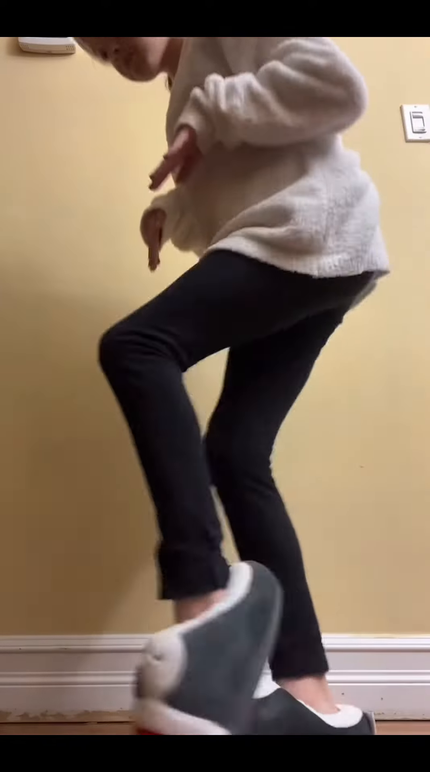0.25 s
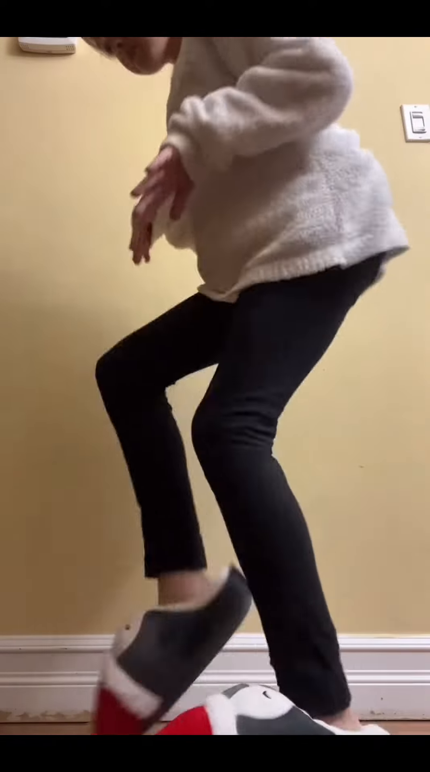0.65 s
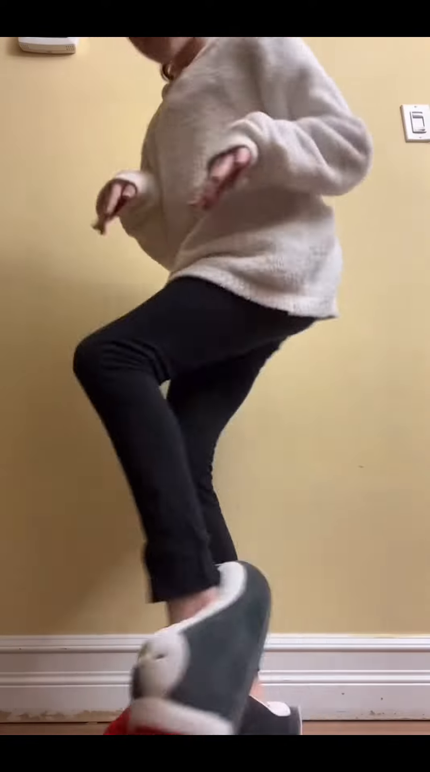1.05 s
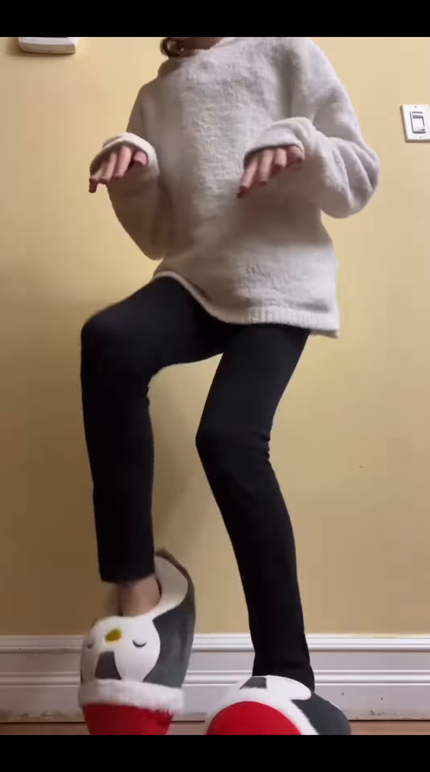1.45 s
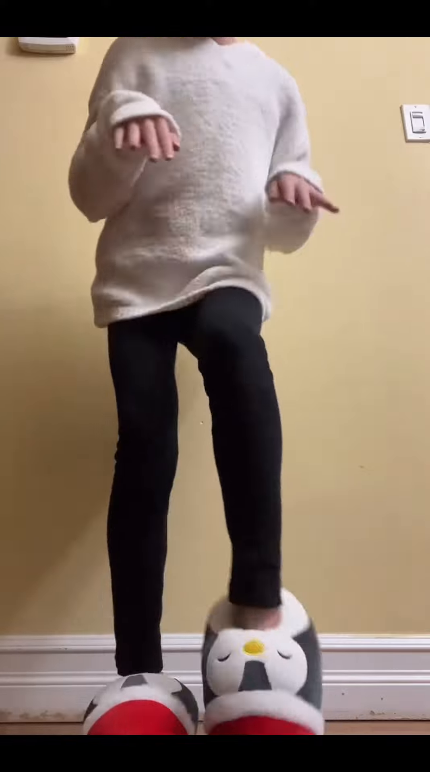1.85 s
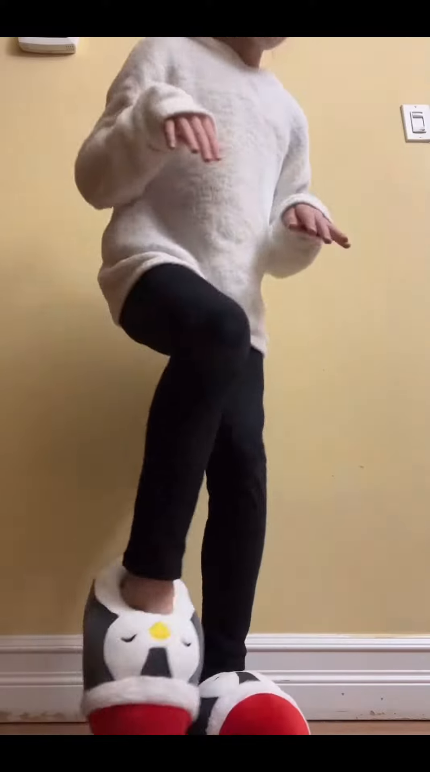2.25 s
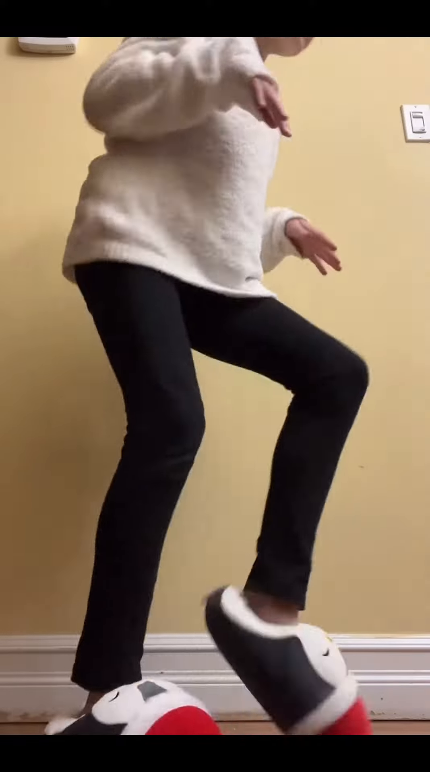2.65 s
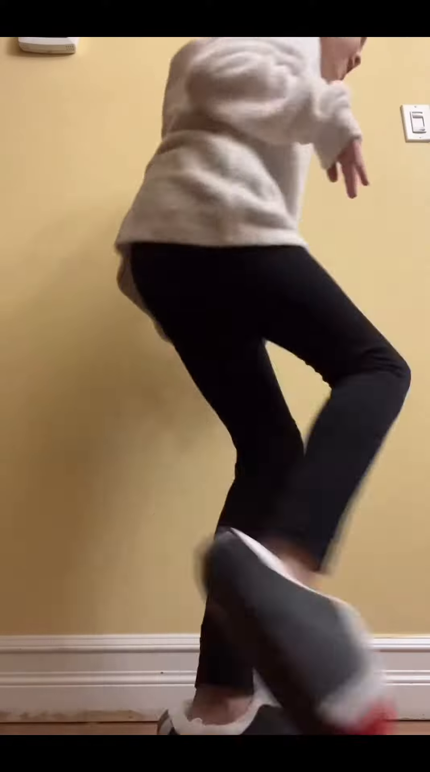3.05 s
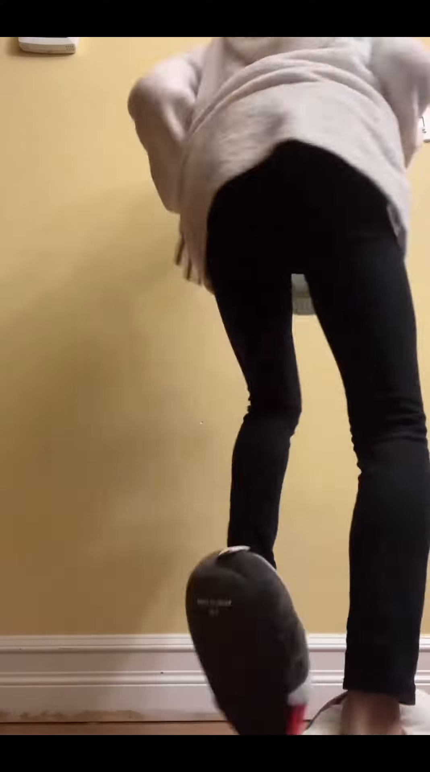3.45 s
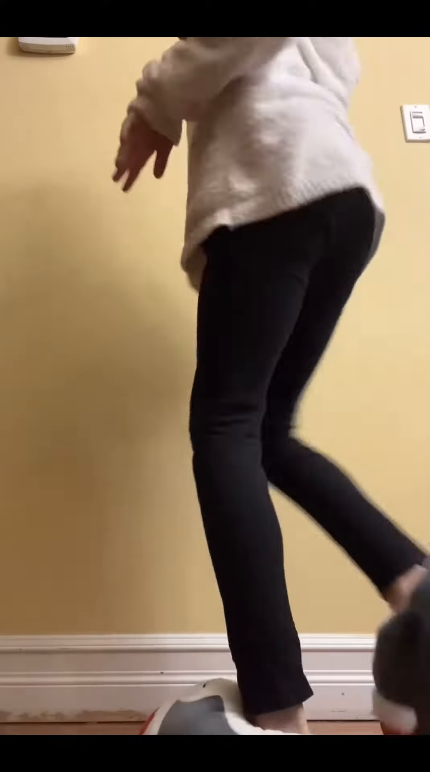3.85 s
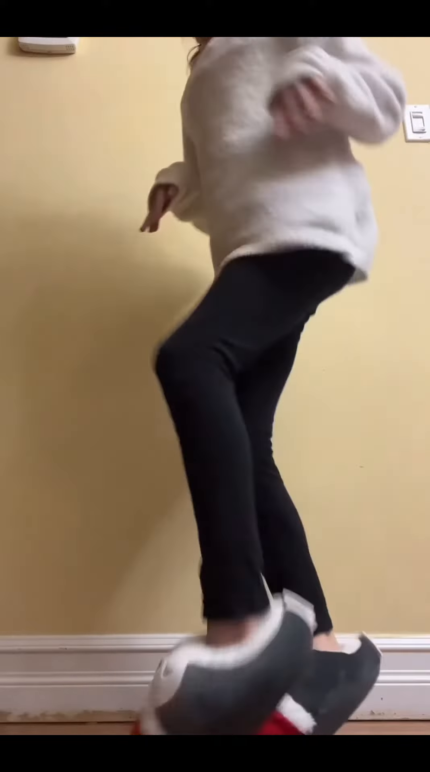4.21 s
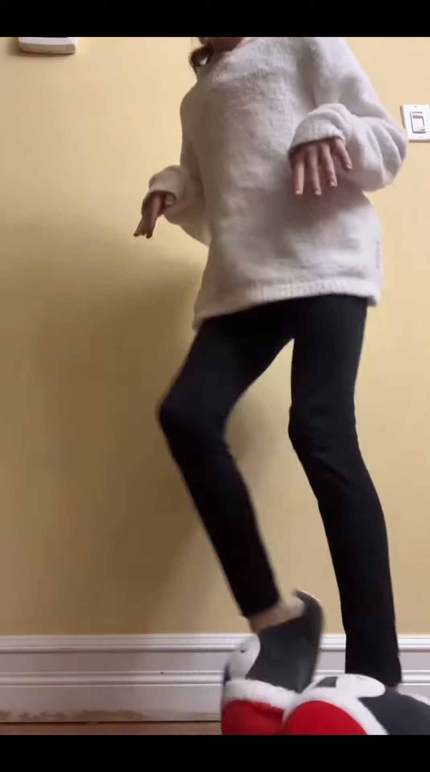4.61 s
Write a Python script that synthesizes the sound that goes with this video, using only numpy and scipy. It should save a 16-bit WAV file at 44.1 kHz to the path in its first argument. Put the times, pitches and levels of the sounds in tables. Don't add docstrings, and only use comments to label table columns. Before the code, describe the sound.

Plush slippers shuffle and scuff quickly over a wooden floor, with crackly ticks, a couple of tiny rubbery squeaks and soft dull pats.

```python
import sys
import numpy as np
from scipy import signal
from scipy.fft import rfft, irfft
from scipy.io import wavfile
from scipy.ndimage import uniform_filter1d, map_coordinates

SR = 44100
rng = np.random.default_rng(int(sys.argv[2]) if len(sys.argv) > 2 else 0)


def gain_from_decibels(decibels):
    exponent = np.asarray(decibels, float) / 20
    return 10 ** exponent


def wav_record(signal):
    frames = np.transpose(np.atleast_2d(signal))
    bounded = np.clip(frames, -1, 1)
    quanta = np.round(bounded * 32767).astype(np.int16)
    wavfile.write(sys.argv[1], SR, quanta)


N = 210562
TOP_HZ = 15780


def unit(x):
    return x / np.sqrt(np.mean(x ** 2) + 1e-20)


def along(points, hz):
    f, v = np.transpose(points)
    return np.interp(np.log(hz + 1), np.log(f + 1), v)


def wobble(rate_hz):
    knots = rng.standard_normal(int(N * rate_hz / SR) + 4)
    return map_coordinates(knots, [np.arange(N) * rate_hz / SR])


def coloured(x, spectrum):
    m = 8192
    magnitude = gain_from_decibels(along(spectrum, np.fft.rfftfreq(m, 1 / SR))) + 1e-4
    cepstrum = irfft(np.log(magnitude))
    cepstrum[1:m // 2] *= 2
    cepstrum[m // 2 + 1:] = 0
    response = irfft(np.exp(rfft(cepstrum)))
    return signal.fftconvolve(x, response)[:N]


def resonate(x, hz, q):
    return signal.lfilter(*signal.iirpeak(hz, q, SR), x)


def add(track, start_s, sound):
    at = track[round(start_s * SR):][:len(sound)]
    at += sound[:len(at)]


def slides():
    # peak_s, level_db, rise_s, fall_s (each spans 20 dB), body_re_level_db
    strokes = [(0.127, -32.5, 0.074, 0.17, -4), (.494, -33, 0.074, 0.088, -3.5),
               (0.95, -33.5, 0.12, 0.15, -4), (1.307, -40.5, 0.096, 0.36, -0.5),
               (1.655, -41, 0.073, .18, -4.5), (2.085, -42, 0.11, 0.2, -0.5),
               (2.466, -40.5, 0.079, 0.21, -2.5), (2.868, -39, 0.077, 0.19, -2.5),
               (3.266, -36.5, 0.064, 0.24, -3.5), (3.704, -36.5, 0.069, 0.18, -8),
               (4.133, -38.5, 0.043, 0.07, -0.5), (4.583, -45.5, 0.12, 0.94, -6.5),
               (.245, -35.5, 0.2, 0.15, -3.5), (.378, -44, 0.016, 0.012, -18), (.68, -39, 0.33, 0.027, -2),
             (.725, -39, .018, 0.076, -8.5), (0.864, -49, 0.0037, 0.14, -2), (1.064, -39, 0.13, 0.052, 2),
             (1.501, -46.5, 0.093, 0.03, 0), (1.837, -42, 0.025, 0.042, -14),
             (1.863, -38.5, 0.057, 0.12, 0.5), (2.603, -39.5, 0.0068, 0.094, 2),
             (3.034, -42, 0.01, 0.079, -1.5), (3.183, -54, .004, .2, -23), (3.39, -43, 0.22, 0.042, -1),
             (3.47, -46.5, .1, 0.041, 6), (3.774, -36, 0.039, 0.12, 3), (3.815, -36.5, 0.026, .2, -15),
             (3.94, -44, 0.14, 0.057, 5), (4.255, -39.5, 0.14, 0.12, -0.5), (4.395, -50, 0.05, 0.02, 2),
             (4.488, -46, .003, 0.23, 2), (4.747, -29, 0.047, 0.037, -0.5)]
    # peak_s, level_db, rise_s, fall_s, fibre_re_level_db
    brushes = [(.248, -32.5, 0.18, 0.092, -5.5), (.47, -41, 0.071, 0.41, -15),
               (.684, -35.5, 0.14, 0.011, -6), (.725, -38.5, 0.028, 0.089, -7.5),
               (1.009, -32, 0.16, 0.14, -6), (1.3, -44.5, 0.19, 0.38, -14), (1.42, -36.5, .1, 0.15, -6),
               (1.75, -49.5, 0.34, 0.39, -9), (1.862, -37.5, 0.058, 0.089, -7.5),
               (2.09, -42.5, 0.056, 0.18, -18), (2.22, -45, 0.1, 0.17, -8), (2.325, -50, .02, .03, -6),
               (2.619, -40.5, 0.044, 0.1, -3), (2.54, -44.5, 0.14, 0.21, -12),
               (2.867, -44.5, 0.073, 0.33, -16), (3.0, -46.5, .1, 0.17, -3.5), (3.265, -36, 0.088, .25, -7),
               (3.41, -38, 0.19, .12, -8.5), (3.704, -44, 0.099, 0.73, -3.5),
               (3.815, -36, 0.089, 0.19, -3.5), (4.131, -34, 0.04, 0.087, -9.5),
               (4.255, -38.5, 0.1, 0.12, -3.5), (4.502, -41, 0.023, 0.088, -13), (4.64, -41, .025, .02, -1),
               (4.675, -40, 0.07, 0.06, -1), (3.41, -36, .015, .02, -6), (4.746, -26.5, .04, 0.032, -8)]
    # time_s, share (0-1)
    grit_share = [(.06, 0.15), (.14, 0.7), (.3, 0.5), (.5, 0.2), (.6, 0.3), (.7, 0.4), (.84, 0.15),
                  (.97, 0.6), (1.2, 0.2), (1.35, 0.3), (2.27, 0.5), (2.45, 0.28), (3.18, 0.15), (3.27, 0.6),
                  (3.55, 0.13), (3.72, 0.5), (3.8, 0.44), (4.5, 0.33)]
    # freq_hz, density_db (per Hz)
    scuff_spectrum = [(1240, -30.5), (2100, -6), (2210, -2.5), (3290, 1), (4250, -2), (5200, -5.5),
                      (6760, -11), (11400, -120)]
    # freq_hz, density_db (per Hz)
    body_spectrum = [(260, -33), (450, -8.5), (562, -11.5), (840, -5.5), (1110, -5.5), (1560, -0.5),
                     (1710, -2), (2500, -5.5), (3250, -26), (5500, -120)]
    # freq_hz, density_db (per Hz)
    swish_spectrum = [(3000, -33), (4800, -4.5), (5800, 3), (6900, 4.5), (7600, 1), (8400, -7.5),
                      (10500, -20.5), (16000, -47)]
    # freq_hz, density_db (per Hz)
    fibre_spectrum = [(4710, -33), (8000, 0.5), (10100, -7), (13700, -9.5), (15600, -13.5)]

    peak_s, db, rise, fall, body_db = np.transpose(strokes)
    scuff = swell(peak_s, db, rise, fall)
    body = swell(peak_s, db + body_db, 0.69 * rise, 1.12 * fall)
    peak_s, db, rise, fall, fibre_db = np.transpose(brushes)
    swish = swell(peak_s, db, rise, fall)
    fibre = swell(peak_s, db + fibre_db, 0.86 * rise, 0.79 * fall)
    swish = np.hypot(swish, gain_from_decibels(-11) * scuff)
    fibre = np.hypot(fibre, gain_from_decibels(-21) * scuff)

    grit = np.interp(np.arange(N) / SR, *np.transpose(grit_share)).clip(0, 1)
    rate_hz = (600 * (scuff / gain_from_decibels(-39)) ** 0.61).clip(260, 1200)
    hiss = gain_from_decibels(1.5 * wobble(40)) * rng.standard_normal(N)
    gritty = catches(rate_hz, spread_db=2.5, t60=0.0029)
    rub = np.sqrt(grit) * gritty + np.sqrt(1 - grit) * unit(hiss)
    rub = patchy(rub, depth_db=2.5)
    twin = rub * np.sign(rng.standard_normal(N))
    fine = twin + 0.15 * rng.standard_normal(N)

    out = scuff * unit(coloured(twin, scuff_spectrum))
    out += body * gain_from_decibels(1.05 * wobble(60)) * unit(coloured(rub, body_spectrum))
    out += swish * unit(coloured(rub, swish_spectrum))
    out += fibre * unit(coloured(fine, fibre_spectrum))
    return gain_from_decibels(-1.2) * out


def swell(peak_s, db, rise, fall):
    roundness = 1.137
    late = np.arange(0, N + 64, 64)[:, None] / SR - peak_s
    reach = np.where(late < 0, -late / np.abs(rise), late / np.abs(fall))
    power = np.sum(gain_from_decibels(db - 20 * reach ** roundness) ** 2, axis=1)
    gain = np.sqrt(power + 1e-12)
    return np.interp(np.arange(N) / 64, np.arange(len(gain)), gain)


def catches(rate_hz, spread_db, t60):
    chances_hz = 1400
    gap, size, luck = rng.random((7200, 3)).T
    at = (np.cumsum(.4 + 1.2 * gap) * SR / chances_hz).astype(int).clip(0, N - 1)
    held = 1 / (1 + np.exp((luck - rate_hz[at] / chances_hz) / .03))
    strength = held * gain_from_decibels(-spread_db * np.log(1 - size).clip(-2.2))
    inside = at < N - 1
    kicks = np.bincount(at[inside], strength[inside], N)
    decay = gain_from_decibels(-60 * np.arange(SR // 20) / SR / t60)
    puff = signal.fftconvolve(kicks, decay)[:N]
    return unit((puff * rng.standard_normal(N) + 3.2 * kicks) / np.sqrt(rate_hz))


def patchy(x, depth_db):
    z = signal.stft(x, nperseg=256)[2]
    field = uniform_filter1d(rng.standard_normal(z.shape), size=3, axis=0)
    field = uniform_filter1d(field, size=10, axis=1)
    return unit(signal.istft(z * gain_from_decibels(depth_db * unit(field)), nperseg=256)[1][:N])


def ticks():
    # start_s, level_db, snap_hz
    dot_snaps = [(0.0285, -28, 9000), (0.039, -25, 5380), (0.0625, -22, 3640), (0.2074, -13, 3840),
                 (0.689, -35, 6980), (0.7705, -24, 7000), (0.861, -23, 5170), (0.8828, -21, 3400),
                 (1.1999, -27, 5800), (1.278, -23, 6400), (1.6493, -37, 3070), (1.8275, -20, 4630),
                 (1.8376, -15.5, 4010), (2.393, -30, 2920), (2.603, -20, 6180), (2.962, -36, 7180),
                 (3.0046, -37, 6860), (3.0336, -18, 6500), (4.492, -27, 11000), (3.2167, -23, 4970),
                 (3.613, -31, 5500), (3.636, -26, 3770), (3.8357, -7, 5860), (3.8574, -27, 6170),
                 (3.897, -38, 9340), (4.006, -25, 6400), (4.0856, -26, 6230), (4.257, -16, 7100),
                 (4.488, -27, 3880), (4.724, -14, 11000),
                 (.0359, -24, 5600), (.0484, -28, 4000), (.0735, -27, 3500), (.0785, -21, 4300),
                (.088, -23, 4000), (.0975, -17, 3500), (.1709, -14, 3200), (.181, -20, 3500),
                (.2237, -11, 4200), (.4155, -33, 5000), (.423, -30, 6000), (.431, -25, 5000),
                (.4383, -21, 4700), (.6524, -17, 6000), (.6667, -15, 4500), (.6822, -13, 4600),
                (.7162, -25, 6100), (.7266, -19, 6800), (.7767, -26, 5100), (.7932, -27, 5800),
                (.872, -26, 3000), (.962, -14, 4500), (1.2046, -30, 5400), (1.2106, -30, 5000),
                (1.2139, -25, 5400), (1.2208, -25, 5200), (1.2377, -24, 5400), (1.2555, -28, 9000),
                (1.46, -26, 9500), (1.57, -34, 7000), (1.8445, -17, 5000), (2.3295, -30, 6200),
                (2.407, -33, 3500), (3.1751, -31, 5600), (3.1781, -30, 4900), (3.1823, -24, 5000),
                (3.1857, -30, 4100), (3.1947, -28, 5200), (3.2022, -27, 4700), (3.6192, -32, 5300),
                (3.6488, -25, 4000), (3.6528, -24, 3700), (3.6724, -21, 4600), (3.6939, -17, 3600),
                (3.7053, -14, 3300), (3.722, -18, 4500), (4.056, -33, 5500), (4.071, -32, 5000),
                (4.0945, -22, 10000), (4.1177, -21, 9500), (4.1235, -19, 3300), (4.1295, -17, 4000),
                (4.1362, -15, 7200), (4.476, -35, 5000), (4.6365, -16, 8500), (4.643, -17, 8500),
                (4.6664, -19, 7100), (4.7185, -20, 7000), (4.7288, -17, 9000), (4.7495, -13, 6000)]
    # first_s, last_s, first_db, last_db, snap_hz
    peels = [
        (2.235, 2.278, -30, -24, 8000),
        (2.785, 2.843, -36, -38, 3500),
        (3.225, 3.245, -26, -22, 5000),
        (1.468, 1.495, -30, -27, 9000),
    ]
    # start_s, level_db, snap_hz, knock_re_level_db, knock_hz
    knocks = [
        (0.194, -19.5, 3170, -13, 1610),
        (0.376, -17, 5840, -16, 810),
        (1.498, -20, 5990, -17, 900),
        (1.508, -18, 5700, -18.5, 726),
        (1.8422, -25, 3550, -12, 1570),
        (1.8644, -35, 2800, -5, 1510),
        (1.873, -36, 2660, 3, 1490),
        (3.9389, -25, 2640, -8.5, 1360),
    ]
    peel_gap_s = .009
    out, t = np.zeros(N), np.arange(SR // 20) / SR

    peeled = []
    for first, last, first_db, last_db, snap_hz in peels:
        for s in np.linspace(first, last, 1 + round((last - first) / peel_gap_s)):
            jittered_s = s + .2 * peel_gap_s * rng.normal()
            db = np.interp(s, [first, last], [first_db, last_db]) + 2.9 * rng.normal()
            peeled.append((jittered_s, db, snap_hz))

    # knock re peak (dB), knock pitch (Hz), t60 (s)
    releases = [(*row, -32, 1620, 0.006) for row in [*dot_snaps, *peeled]]
    releases += [(*row, 0.013) for row in knocks]
    for s, db, snap_hz, knock_db, knock_hz, t60 in releases:
        fade = gain_from_decibels(-60 * t / max(t60, .002))
        burst = rng.standard_normal((2, len(t))) * fade
        burst[0, 0] = 4
        snap = resonate(burst[0], snap_hz, 1.2)
        knock = resonate(burst[1] / np.sqrt(fade), knock_hz, 2.2)
        add(out, s, gain_from_decibels(db - 6.0) * snap / abs(snap).max())
        add(out, s + 0.0008, gain_from_decibels(db + knock_db + 12.0) * knock / abs(knock).max())
    return coloured(out, [(250, -52), (500, -10), (2800, 3), (7500, 4.0), (9000, -9.5), (15000, -10)])


def squeaks():
    # start_s, stop_s, start_hz, stop_hz, level_db
    glides = [(1.085, 1.094, 4700, 8200, -32), (4.695, 4.714, 2650, 3050, -33),
              (4.234, 4.25, 1000, 5000, -31), (3.003, 3.008, 6300, 8800, -34),
              (2.959, 2.967, 6830, 8000, -35.5), (2.976, 2.984, 7800, 10300, -31),
              (2.986, 2.991, 9300, 12200, -25), (2.997, 3.002, 8800, 10600, -30),
              (3.4, 3.4136, 1357, 2050, -13.5), (4.245, 4.252, 8200, 12200, -25),
              (4.254, 4.259, 8800, 11500, -26), (4.257, 4.262, 2260, 3630, -26),
              (4.267, 4.273, 6700, 8100, -31), (3.778, 3.8054, 641.5, 1538, -8.5),
              (3.809, 3.834, 2900, 4600, -30)]
    # start_s, level_db, pitch_hz, t60_s
    rings = [
        (3.413, -34.5, 1736, 0.39),
        (3.805, -43, 1370, .3),
    ]
    # freq_hz, level_db
    rubber_spectrum = [(300, -25), (600, -7.5), (2000, 1), (3000, -6), (4000, 1.5), (5000, -3.5),
                       (7000, 5.5), (9000, -9), (15000, -33)]
    out = np.zeros(N)
    for start, stop, hz0, hz1, db in glides:
        slope_db = -10.5 - 5 * np.log2(hz0 / 1000)
        u = np.linspace(0, 1, round((stop - start) * SR))
        shake = uniform_filter1d(rng.standard_normal((2, SR // 20)), size=30)[:, :len(u)]
        slip_hz = hz0 * (hz1 / hz0) ** u * (1 + 0.24 * shake[0])
        phase = 2 * np.pi * np.cumsum(slip_hz) / SR
        pulses = sum(gain_from_decibels(slope_db * np.log2(k)) * np.cos(k * phase)
                     for k in range(1, 7) if k * hz1 < TOP_HZ)
        noise = rng.standard_normal(SR // 20)[:len(u)]
        rasp = 0.45 * min(1, 2000 / hz1) ** 2 * (1 + np.cos(phase)) * noise
        left = (1 - u) * (stop - start)
        bite_db = -10 / (1 + np.exp((.0065 - left) / .0012))
        ramps = np.minimum(1, 8 * u) * np.minimum(1, left / 0.0017)
        add(out, start, gain_from_decibels(db + bite_db + 7 * shake[1]) * ramps * (pulses + rasp))
    for s, db, hz, t60 in rings:
        ring = resonate(rng.standard_normal(SR // 2), hz, 11)
        add(out, s, gain_from_decibels(db - 60 * np.arange(SR // 2) / SR / t60) * unit(ring))
    return coloured(out, rubber_spectrum)


def puffs():
    # start_s, level_db, centre_hz, rise_s, t60_s
    squeezes = [(3.397, -20.5, 2200, 0.0046, 0.041), (4.38, -50, 3200, 0.012, 0.07),
                (1.508, -39.5, 270, .004, 0.085), (.495, -34.5, 680, 0.015, 0.19),
                (2.166, -29, 6300, 0.008, 0.034), (2.197, -33, 6300, 0.004, 0.034),
                (2.89, -41, 680, 0.018, 0.25), (3.412, -25, 5930, 0.0009, 0.02),
                (3.409, -30, 16000, .002, .03), (0.32, -50, 11000, .001, 0.013),
                (3.893, -26, 9300, 0.0034, 0.032), (0.666, -48, 6600, 0.0028, 0.059),
                (.68, -37, 5000, 0.0034, 0.012), (1.5, -36, 440, 0.0099, 0.13),
                (1.507, -37, 11500, .002, .025), (4.38, -43.5, 8700, .01, 0.096),
                (1.861, -22.5, 1590, 0.0039, 0.074), (3.403, -34, 6300, 0.0058, 0.035),
                (3.805, -23, 5300, .001, 0.024), (3.8085, -16, 7000, .002, 0.018),
                (1.86, -27, 2400, .004, .08), (4.735, -31, 520, .005, .08), (.378, -36, 480, .002, .05),
                (1.858, -34, 900, .004, .07), (3.399, -26, 1350, .003, .04), (4.25, -29, 8000, .002, .02),
                (2.614, -34, 10500, .006, .06), (.975, -35, 8000, .02, .2), (1.32, -33, 1400, .008, .08),
                (4.59, -36, 2400, .01, .12), (4.729, -21, 1250, 0.0054, 0.073)]
    out, t = np.zeros(N), np.arange(SR // 5) / SR
    for s, db, hz, rise, t60 in squeezes:
        air = resonate(rng.standard_normal(len(t)), hz, 3.2)
        add(out, s, gain_from_decibels(db - 60 * t / t60) * (1 - np.exp(-t / rise)) * unit(air))
    return out


def pats():
    # start_s, level_db, pitch_hz, t60_s
    footfalls = [(0.315, -36.5, 207, 0.04), (0.378, -42, 212, 0.084), (0.571, -47.5, 199, 0.08),
                 (1.066, -40.5, 228, 0.046), (1.382, -34, 187, 0.043), (1.444, -35, 196, 0.047),
                 (1.509, -39, 326, .07), (1.519, -41.5, 394, 0.06), (1.742, -44, 188, 0.091),
                 (2.174, -41, 260, 0.06), (2.297, -41, 274, 0.031), (2.488, -45.5, 229, 0.14),
                 (3.947, -42.5, 217, 0.059), (4.259, -49, 226, 0.065), (4.416, -29.5, 170, 0.04),
                 (0.396, -42, 300, .02), (4.436, -34.5, 129, 0.05), (4.453, -43, 124, 0.054),
                 (4.637, -41, 150, 0.053), (4.742, -31, 212, 0.12), (4.758, -29, 214, 0.074)]
    out, t = np.zeros(N), np.arange(SR // 5) / SR
    for s, db, hz, t60 in footfalls:
        rattle = uniform_filter1d(rng.standard_normal(len(t)), size=40)
        modes = np.sin(2 * np.pi * hz * t) + 0.37 * np.sin(2 * np.pi * 1.67 * hz * t)
        onset = 1 - np.exp(-t / 0.0023)
        add(out, s, gain_from_decibels(db + 3.0 - 60 * t / max(t60, .01)) * onset * (modes + 1.4 * rattle))
    return out


def room(x):
    # freq_hz, t60_s
    decay_times = [(200, 0.83), (1500, 0.26), (6000, 0.04), (14000, 0.28)]
    hz, t, z = signal.stft(rng.standard_normal(SR // 2), SR, nperseg=256)
    decay = gain_from_decibels(-60 * t / along(decay_times, hz)[:, None])
    tail = signal.istft(z * decay, SR, nperseg=256)[1]
    delayed = np.pad(x, (250, 0))
    return signal.fftconvolve(delayed, tail / np.linalg.norm(tail))[:N]


def house():
    # freq_hz, density_db (per Hz)
    rumble_spectrum = [(12, -33), (20, -31), (49, 0), (81, 3), (125, -8), (163, -10), (210, -5.5),
                       (428, -11), (528, -20.5), (700, -15.5), (910, -50), (1540, -120)]
    # freq_hz, density_db (per Hz)
    hiss_spectrum = [(290, -35), (500, -5), (1070, 3.5), (1610, 1), (4400, -3), (6490, 3), (9850, -11),
                     (13700, -8), (15600, -13)]
    rumble = gain_from_decibels(-52.5 + 1 * wobble(4.97)) * unit(coloured(rng.standard_normal(N), rumble_spectrum))
    drone = gain_from_decibels(-61.0) * unit(resonate(rng.standard_normal(N), 67, 3.5))
    hum_phase = 2 * np.pi * 119.8 * np.arange(N) / SR + 0.15 * wobble(12)
    hum = gain_from_decibels(-58.0 + 2.0 * wobble(7.9)) * np.sin(hum_phase)
    hiss = gain_from_decibels(-60.5) * unit(coloured(rng.standard_normal(N), hiss_spectrum))
    return rumble + drone + hum + hiss


def scene():
    rubbing = slides()
    hits = ticks() + pats() + puffs()
    squeals = squeaks()
    answer = room(gain_from_decibels(-9.5) * rubbing + gain_from_decibels(-7.5) * hits + gain_from_decibels(-15) * squeals)
    return (rubbing + hits + squeals + answer + house())[None]


def roll_off(x):
    return signal.sosfilt(signal.butter(12, 15770, fs=SR, output="sos"), x)


def record(dry):
    passed = np.fft.rfftfreq(N, 1 / SR) < TOP_HZ
    kept = irfft(rfft(dry) * passed, N)
    return roll_off(kept)


dry = scene()
out = record(dry)
wav_record(out)
```